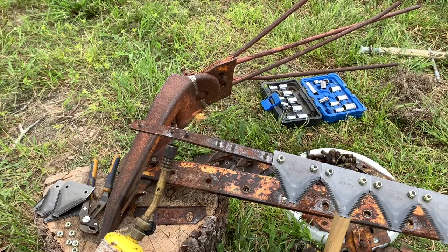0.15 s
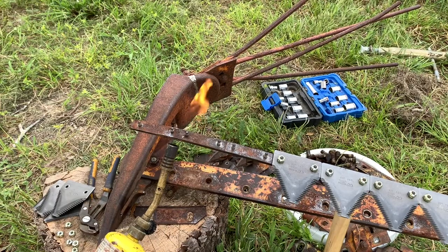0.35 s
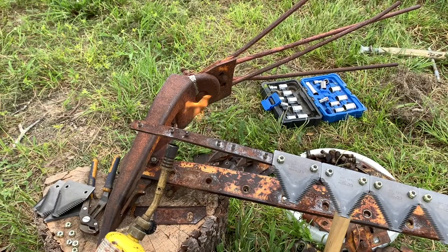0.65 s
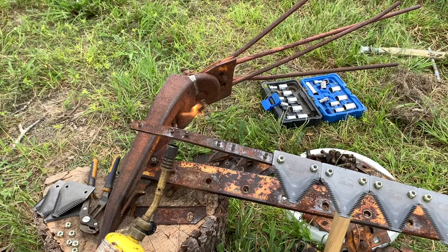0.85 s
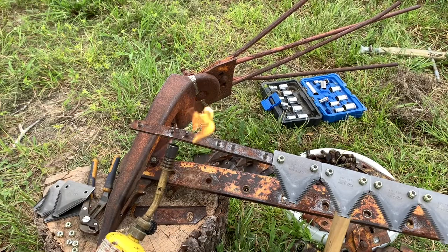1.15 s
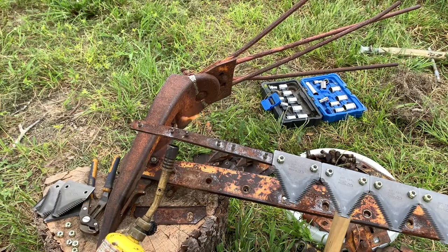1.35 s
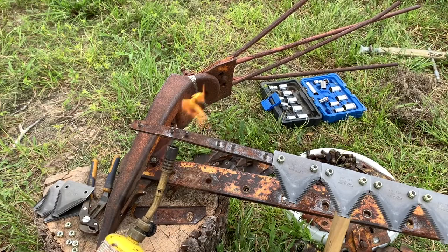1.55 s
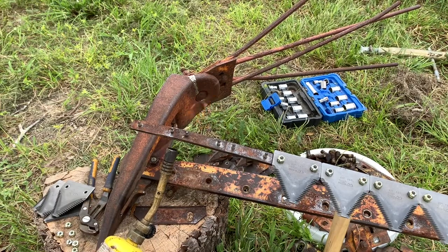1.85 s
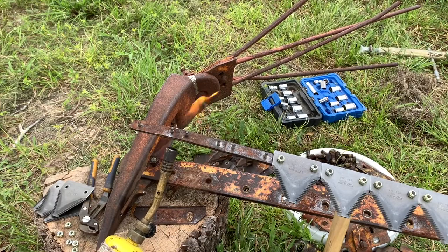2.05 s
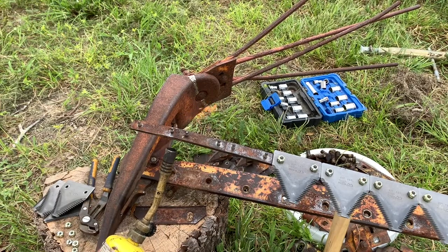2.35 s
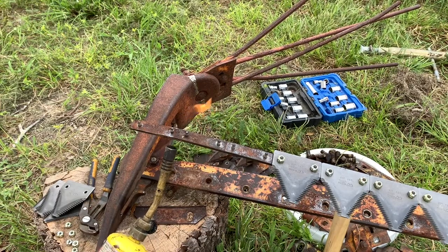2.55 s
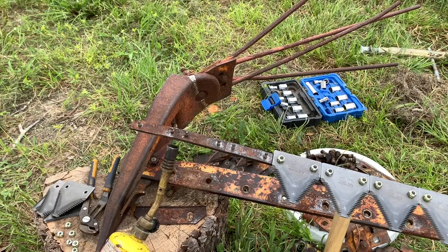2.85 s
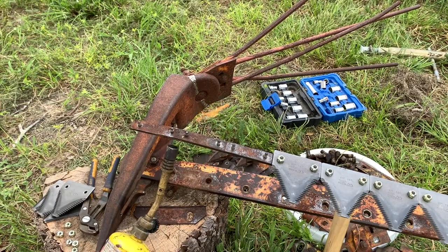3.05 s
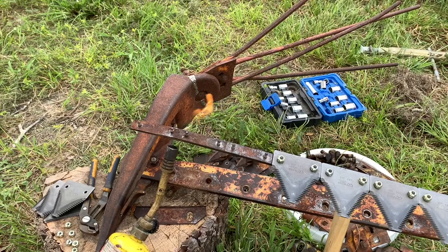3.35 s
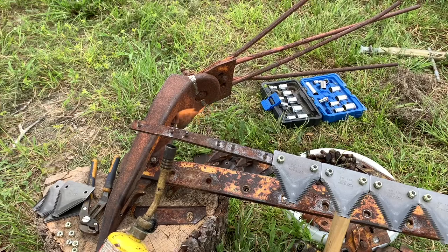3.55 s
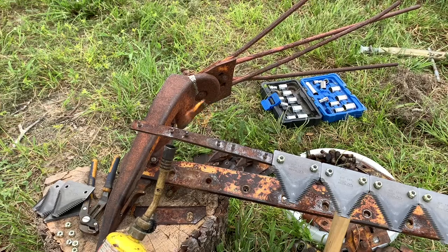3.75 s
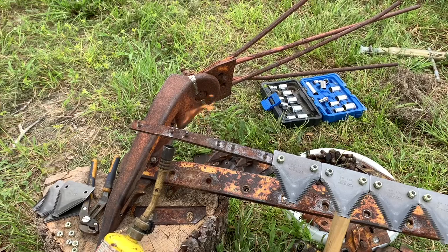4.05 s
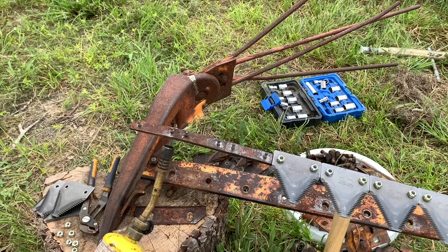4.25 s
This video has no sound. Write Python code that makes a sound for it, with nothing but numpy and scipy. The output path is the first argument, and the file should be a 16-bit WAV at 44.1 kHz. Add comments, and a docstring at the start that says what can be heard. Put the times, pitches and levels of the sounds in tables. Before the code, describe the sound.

A handheld gas torch heats a rusty steel bracket in an open yard, about an arm's length from the microphone, with no echo. Its sound runs throughout: a soft, low, fluttering flame roar with a thin, high hiss of gas above it. A few tiny ticks come from the hot metal in the first 0.2 seconds. From about 0.5 to 1.5 seconds the flame wavers, flaring briefly near 0.8 and 1 second and dropping away around 1.2. By 1.8 seconds it is back to a fuller, steady roar that holds to the end, while the hiss shifts slightly in tone. The metal gives a short gritty crackle at 2.5 seconds, a faint tick at 3.5 and a sharp one at 4.3. Underneath, light wind rumbles on the microphone, swelling near 2.8 seconds, with small gusts around 1.3 and from 3.9 onward.

```python
"""A handheld gas torch heats a steel bracket in an open yard, an arm's length from the microphone.
The flame roars and flutters against the steel, easing when the breeze lifts it, while gas hisses
through the resonances of the burner tube. The hot, rusty metal ticks a few times.
Underneath, wind sways and rumbles on the microphone."""
import sys
import numpy as np
from scipy import signal
from scipy.fft import rfft, irfft
from scipy.io import wavfile

SR = 44100
rng = np.random.default_rng(int(sys.argv[2]) if len(sys.argv) > 2 else 0)


def pcm_store(signal):
    """Save signal as 16-bit PCM."""
    levels = np.round(np.clip(np.atleast_2d(signal), -1, 1) * 32767)
    wavfile.write(sys.argv[1], SR, levels.astype(np.int16).T)


N = 194743
T = np.arange(N) / SR
HZ = np.maximum(np.arange(N // 2 + 1) * SR / N, 1e-3)

# how hard the flame plays on the steel: t/s, relative level/dB
ROAR_LEVEL = [(0, -49), (.33, -50), (.65, -54.5), (.82, -51.5), (1.02, -47), (1.11, -56.5), (1.25, -57),
              (1.29, -52), (1.52, -52), (1.8, -47.5), (2.5, -46.5), (2.64, -47.5), (3.15, -46),
              (3.55, -48.5), (3.87, -45.5), (4.42, -46.5)]
# the flame flares up (+) or tears off the steel (-): t/s, change/dB, half length/s
ROAR_FLARES = [(0.37, -2, 0.022), (.775, 5.5, .018), (0.95, 2.5, .01), (1.13, -7, .014), (1.194, -5, .01),
               (1.208, 3, .01), (1.255, -2, 0.012), (3.17, 1.5, 0.011), (4.379, 4, 0.01)]
# colour of the roar: f/Hz, relative level/dB
ROAR_SPECTRUM = [(25, -9), (75, -3.5), (130, -2.5), (205, 0), (330, -3), (460, -8), (1000, -15),
                 (1400, -14), (1700, -19.5), (2500, -17.5), (2900, -26.5), (4500, -21), (8000, -34.5),
                 (16000, -47)]
# pitches reinforced by the steel frame around the flame: f/Hz, width/Hz, boost/dB
FRAME_RESONANCES = [(647, 104, 6), (924, 100, 5), (1166, 132, 6), (1840, 230, 3.5), (2200, 360, 3),
                    (2660, 156, 4.5), (3234, 300, 6.5), (3810, 72, 3.5), (5700, 180, 3.5)]


def flame(full_roar_db=-47, billow_db=-49, crackle_db=-55.5, puffs_per_s=1100):
    """Pockets of gas flare as one-sided pressure puffs over an eddying roar; a weak flame flutters more."""
    roar_db, = curves(ROAR_LEVEL)
    ease_db = roar_db - full_roar_db  # 0 with the flame lying full on the steel
    drive_db = ease_db + sum(db * swell(s, half_s) for s, db, half_s in ROAR_FLARES)
    puff_sizes = undb(2.5 * np.minimum(rng.exponential(size=N), 5))
    puffs = puff_sizes * (rng.random(N) < puffs_per_s / SR)
    eddies = noise() * undb(2.5 * drift(hz=147))
    burning = eddies + undb(-.5) * unit(puffs - puffs.mean())
    flutter = undb((.7 - .1 * ease_db) * drift(hz=25))
    boosts = [1 + (undb(db) - 1) * resonance(hz, width_hz) for hz, width_hz, db in FRAME_RESONANCES]
    roar = through(burning * flutter, colour(ROAR_SPECTRUM) * np.prod(boosts, axis=0))
    # big eddies sound low and small ones high; the smallest come in spitting bursts
    lows, highs = below(252), 1 - below(1350)
    billow = through(roar, lows) * undb(1.5 * drift(hz=14))
    body = through(roar, 1 - lows - highs)
    crackle = through(roar, highs) * undb(1.47 * drift(hz=125))
    return (unit(billow) * undb(billow_db + .62 * drive_db)
            + unit(body) * undb(full_roar_db - 1 + drive_db)
            + unit(crackle) * undb(crackle_db + .99 * drive_db))


# hiss of the gas jet: t/s, relative level/dB
HISS_LEVEL = [(0, -53.5), (.24, -56.5), (.48, -55), (1.05, -56), (1.23, -60.5), (1.33, -56.5), (1.5, -57.5),
              (1.78, -55), (4.42, -56)]
# how squarely the nozzle faces the steel: t/s, aim/0-1
NOZZLE_AIM = [(0, 0.03), (1.0, 0), (1.9, .15), (2.3, 0.9), (3.8, 1), (4.1, 0.4), (4.42, 0.8)]
# burner tube resonances: f/Hz, nominal width/Hz, gain aslant/dB, gain square on/dB
TUBE_RESONANCES = [(7175, 407, 0, -0.5), (7730, 216, -2.5, -3), (8400, 330, -6.5, -8),
                   (8980, 670, -13.5, -10.5), (9820, 450, -7, -18.5), (10200, 260, -16, -5),
                   (10770, 410, -16.5, -11), (11700, 760, -19, -18.5), (12500, 790, -13.5, -12),
                   (12900, 530, -12.5, -10), (13700, 850, -15, -20), (15050, 700, -23, -16.5)]


def gas_jet(ring_hz=4680, ring_db=-63.5, lift_below_db=-51.5, widen=1.39):
    """Gas rings the burner tube; the aim decides which resonances carry; a lifted flame frees the lowest."""
    hiss_db, = curves(HISS_LEVEL)
    roar_db, = curves(ROAR_LEVEL)
    aim, = curves(NOZZLE_AIM)
    hiss = undb(-25) * through(noise(), 1 - below(6800, order=12))
    for hz, width_hz, aslant_db, square_db in TUBE_RESONANCES:
        gain = undb(aslant_db + aim * (square_db - aslant_db) + 1.35 * drift(hz=8.9))
        hiss += gain * noise_band(hz, widen * width_hz)
    lifted = np.clip((lift_below_db - roar_db) / 5, 0, 1)
    ring = unit(noise_band(ring_hz, widen * 260)) * undb(ring_db + 3.5 * lifted)
    flicker = undb(.73 * drift(hz=84))
    return (unit(hiss) * undb(hiss_db + .5) + ring) * flicker


# flakes cracking off: t/s, relative level/dB, decay/s, centre f/Hz, nominal width/Hz
RUST_CRACKS = [(.038, -40, 0.0046, 3640, 10), (.037, -44, .005, 10400, 200), (.088, -40, .004, 10400, 4000),
               (.160, -38.5, 0.0035, 8500, 5000), (2.5305, -38, .002, 4500, 4000),
               (2.5345, -41, .002, 10800, 4000), (2.538, -32, .0018, 10700, 4500),
               (2.5395, -35, .003, 2500, 3300), (2.5437, -27.5, .0008, 3000, 9200),
               (3.4868, -36, .001, 5200, 300), (4.3138, -26, 0.00077, 4000, 9000)]
# resonances of the hot bracket: f/Hz, width/Hz, gain/dB
BRACKET_RESONANCES = [(2330, 1400, 11.5), (3640, 220, -6), (4770, 560, 0), (7000, 530, 7), (9850, 1600, 4)]


def rust_ticks(gain_db=-6, snap_db=9, dull_hz=12900):
    """Flakes of rust crack off the hot steel: a snap, then a short gritty burst."""
    bracket = sum(undb(db) * resonance(hz, width_hz) for hz, width_hz, db in BRACKET_RESONANCES)
    bracket *= below(dull_hz, order=16)
    ticks = np.zeros(N)
    for s, db, decay_s, hz, width_hz in RUST_CRACKS:
        crack = noise() * (T >= s) * np.exp(-np.abs(T - s) / decay_s)
        crack[int(s * SR)] += undb(snap_db)
        response = unit(bracket * resonance(hz, width_hz) ** .5)
        ticks += undb(db + gain_db) * through(crack, response)
    return ticks


# the breeze across the yard: t/s, relative level/dB
BREEZE_LEVEL = [(0, -54.5), (1.1, -52.5), (2.25, -56), (2.75, -44.5), (3.15, -51.5), (4.42, -49.5)]
# colour of the wind on the microphone: f/Hz, relative level/dB
WIND_SPECTRUM = [(1, -8), (2.5, 4.5), (4.2, -2), (7, -3), (12, -18.5), (24, -30), (50, -45), (150, -57),
                 (600, -100)]
# gusts that buffet the microphone: t/s, level/dB, half length/s
MIC_GUSTS = [(0.307, -54, 0.029), (1.3, -46, .02), (2.933, -52, .03), (3.096, -51, 0.04),
             (3.898, -43, 0.052), (4.19, -47, 0.093), (4.33, -39, 0.022)]


def wind(sway_gain_db=15.5, buffet_hz=85):
    """Air presses on the microphone: a sway below hearing with a soft rumble; gusts flutter higher."""
    breeze_db, = curves(BREEZE_LEVEL)
    sway = unit(through(noise(), colour(WIND_SPECTRUM))) * undb(breeze_db + sway_gain_db)
    gusts = sum(undb(db) * swell(s, half_s) for s, db, half_s in MIC_GUSTS)
    return sway + gusts * unit(noise_band(buffet_hz, 95))


def undb(db):
    """Decibels to gain."""
    return 10 ** (np.asarray(db) / 20)


def unit(x):
    """Scale to rms 1."""
    return x / np.sqrt(np.mean(np.abs(x) ** 2))


def curves(table):
    """Each column of a table of timed rows, at every sample."""
    s, *columns = np.transpose(table)
    return [np.interp(T, s, column) for column in columns]


def swell(s, half_s):
    """A smooth rise and fall around a moment, height 1."""
    return np.exp(-((T - s) / half_s) ** 2)


def noise():
    """White noise."""
    return rng.standard_normal(N)


def noise_band(hz, width_hz):
    """White noise passed twice through one resonance."""
    return through(noise(), resonance(hz, width_hz) ** 2)


def drift(hz):
    """Random drift up to about a given rate, rms 1."""
    return unit(through(noise(), below(hz, order=2)))


def through(x, response):
    """Filter by a frequency response."""
    return irfft(rfft(x) * response, N)


def colour(points):
    """Causal response with the gains of (f/Hz, level/dB) points."""
    hz, db = np.transpose(points)
    gain = undb(np.interp(np.log(HZ), np.log(hz), db))
    cepstrum = irfft(np.log(gain), N)
    cepstrum[1:N // 2] *= 2
    cepstrum[N // 2:] = 0
    return np.exp(rfft(cepstrum))


def resonance(hz, width_hz):
    """Response of one resonance, gain 1 at its centre."""
    return 1 / (1 + 1j * (HZ ** 2 - hz ** 2) / (HZ * width_hz))


def below(hz, order=4):
    """Smooth low-pass gain."""
    return 1 / (1 + (HZ / hz) ** order)


def scene():
    """Torch, steel and breeze at one microphone, over grass that gives no echo."""
    return (flame() + gas_jet() + rust_ticks() + wind())[None]


def record(dry, top_hz=15700):
    """The recorder cuts the top of the treble steeply."""
    return signal.sosfilt(signal.ellip(12, .1, 80, top_hz, fs=SR, output="sos"), dry)


dry = scene()
out = record(dry)
pcm_store(out)
```